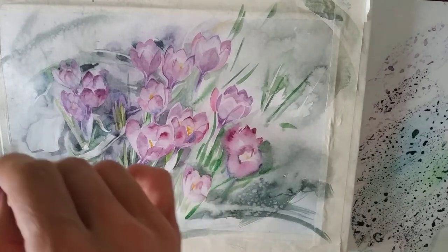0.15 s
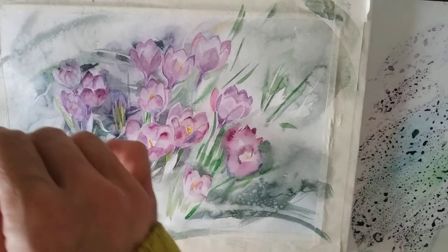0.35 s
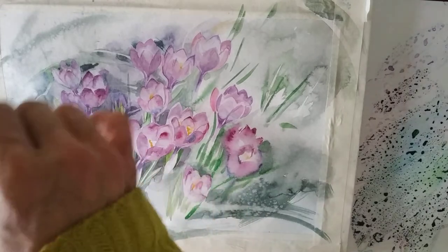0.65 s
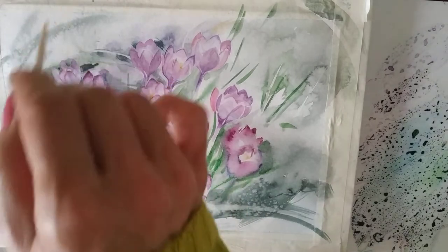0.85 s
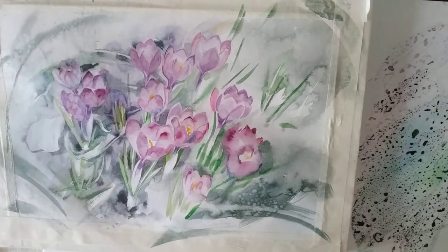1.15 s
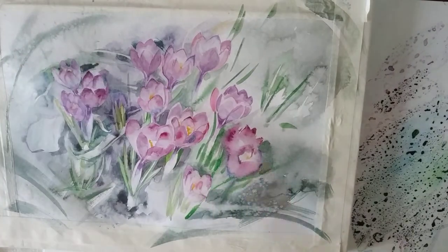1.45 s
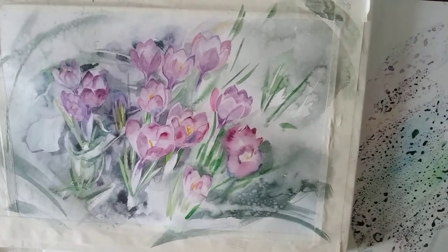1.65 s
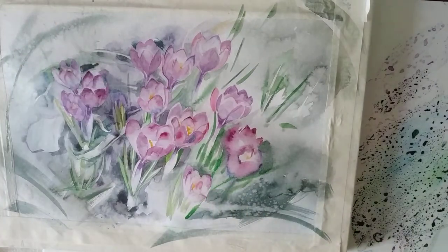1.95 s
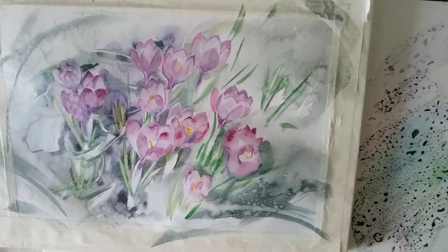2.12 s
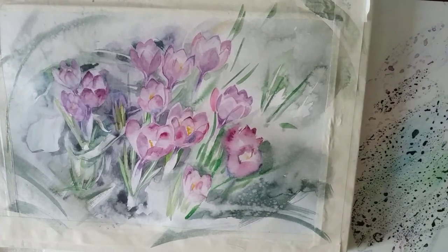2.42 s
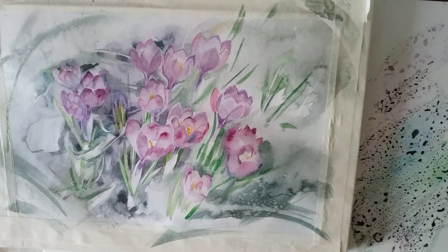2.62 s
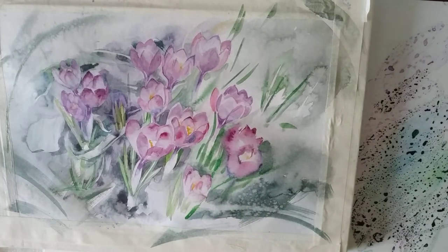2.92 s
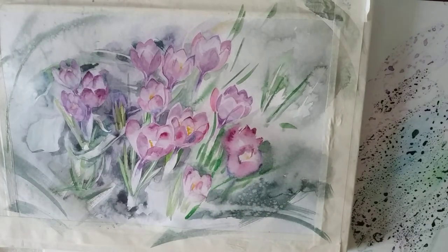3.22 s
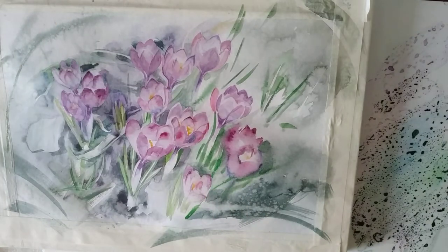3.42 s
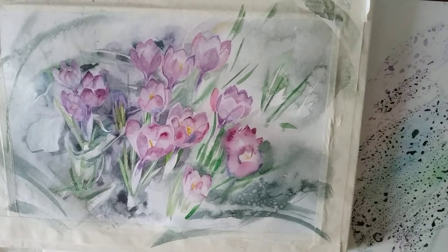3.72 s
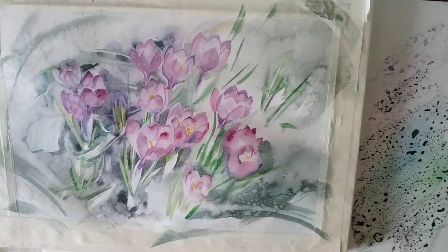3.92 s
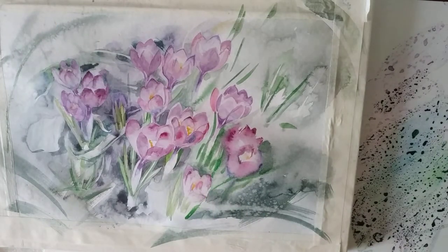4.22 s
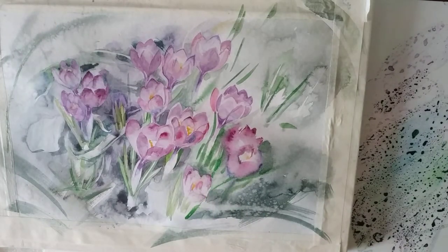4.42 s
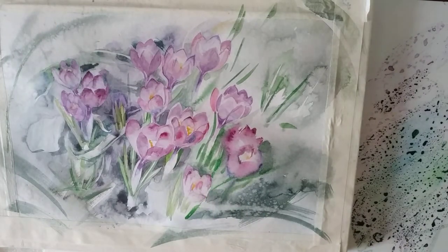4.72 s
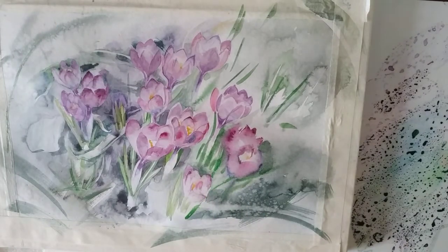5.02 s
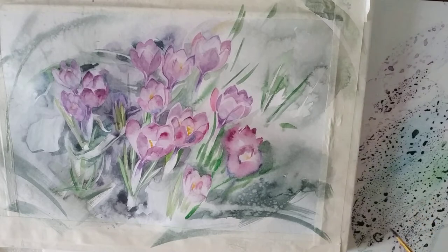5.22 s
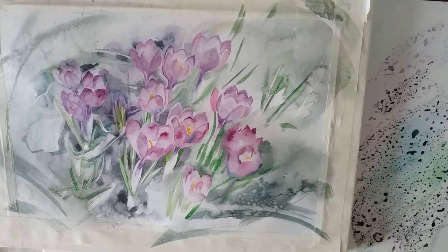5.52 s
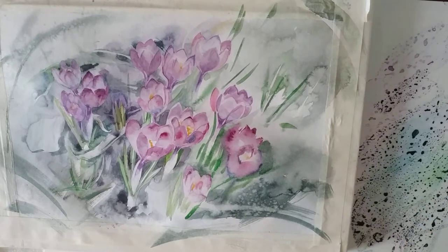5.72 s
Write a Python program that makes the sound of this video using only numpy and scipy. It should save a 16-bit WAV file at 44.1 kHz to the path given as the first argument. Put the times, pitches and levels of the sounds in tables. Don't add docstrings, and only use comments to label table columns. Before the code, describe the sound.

Wool sleeve rustles over a quiet room; a jar thuds down, a brush taps glass sharply, water blips, then two dry rim knocks.

```python
import sys
import numpy as np
from scipy import signal
from scipy.fft import rfft, irfft, next_fast_len
from scipy.io import wavfile
from scipy.ndimage import uniform_filter1d, map_coordinates

SR = 44100
rng = np.random.default_rng(int(sys.argv[2]) if len(sys.argv) > 2 else 0)


def makeup_ratio(level_db):
    decades = np.asarray(level_db, float) / 20
    return 10 ** decades


def transcribe(signal):
    frames = np.atleast_2d(signal).T
    limited = np.clip(frames, -1, 1)
    pcm = np.round(limited * 32767).astype(np.int16)
    wavfile.write(sys.argv[1], SR, pcm)


N = 258639
JAR_LAG = 18
TOP_HZ = 15800


def unit(x):
    return x / np.sqrt(np.mean(x ** 2) + 1e-20)


def along(points, hz):
    f, v = np.transpose(points)
    return np.interp(np.log(hz + 1), np.log(f + 1), v)


def wobble(rate, size=N):
    knots = rng.standard_normal(int(size * rate / SR) + 4)
    return map_coordinates(knots, [np.arange(size) * rate / SR])


def swell(s, rise, fall):
    t = np.arange(N) / SR - s
    return np.exp(-(t / np.where(t < 0, rise, fall)) ** 2)


def arch(u, peak):
    u, peak = np.clip(u, 0, 1), np.clip(peak, .05, .95)
    return np.sin(np.pi / 2 * np.minimum(u / peak, (1 - u) / (1 - peak)))


def filtered(x, response):
    m = next_fast_len(x.shape[-1] + 8192)
    spectrum = rfft(x, m) * response(np.fft.rfftfreq(m, 1 / SR))
    return irfft(spectrum, m)[..., :x.shape[-1]]


def causal(gain_db):
    cepstrum = irfft(np.log(np.maximum(makeup_ratio(gain_db), 1e-4)))
    cepstrum[1:2048] *= 2
    cepstrum[2049:] = 0
    pulse = irfft(np.exp(rfft(cepstrum)))[:1024]
    return pulse / np.abs(pulse).max()


def patchy(patchy_db):
    z = signal.stft(rng.standard_normal((2, N + 512)), nperseg=512)[2]
    field = uniform_filter1d(rng.standard_normal(z.shape[1:]), size=8, axis=0)
    field = uniform_filter1d(field, size=10, axis=1)
    return signal.istft(z * makeup_ratio(patchy_db * unit(field)), nperseg=512)[1][:, :N]


def swish(noise, s, centre_hz, octaves):
    hz, t, z = signal.stft(noise, SR, nperseg=512)
    centre = np.interp(t, s, centre_hz)
    distance = np.log2((hz[:, None] + 1) / centre) / octaves
    hump = np.exp(-.5 * distance ** 2) / np.sqrt(centre) * (hz[:, None] < TOP_HZ)
    return unit(signal.istft(z * hump, SR, nperseg=512)[1][:, :N])


def ring(modes, scatter_db, beat_db=2.0):
    t = np.arange(SR // 3) / SR
    out = np.zeros(len(t))
    for hz, db, t60, rise in modes:
        level_db = db + scatter_db * rng.standard_normal() - 60 * t / t60
        level_db = level_db + beat_db * wobble(12 / t60, size=len(t))
        out += makeup_ratio(level_db) * (1 - np.exp(-t / rise)) * np.sin(2 * np.pi * hz * t)
    return out


# (f/Hz, t60/s)
ROOM_DECAY = [(200, 0.468), (1000, 0.25), (4000, 0.223), (10000, 0.1045), (16000, 0.128)]


def add(out, s, x, pan_db, wet_db, lag=JAR_LAG):
    hz, t, z = signal.stft(rng.standard_normal((2, SR // 3)), SR, nperseg=128)
    decay = makeup_ratio(-60 * t / along(ROOM_DECAY, hz)[:, None]) * (hz[:, None] < TOP_HZ)
    tail = signal.istft(z * decay, SR, nperseg=128)[1]
    tail = np.pad(tail / np.linalg.norm(tail[0]), ((0, 0), (200, 0)))
    x = np.atleast_2d(x) * makeup_ratio([[pan_db / 2], [-pan_db / 2]])
    heard = makeup_ratio(wet_db) * signal.fftconvolve(x.mean(axis=0, keepdims=True), tail, axes=1)
    heard[0, lag:lag + x.shape[1]] += x[0]
    heard[1, :x.shape[1]] += x[1]
    start = round(s * SR)
    out[:, start:start + heard.shape[1]] += heard[:, :N - start]


# (f/Hz, level/dB per Hz)
ROOM_TONE = [(40, -48.5), (70, -31), (100, -15.5), (200, -4.5), (300, -5.5), (600, -10), (1200, -13.5),
             (2500, -16), (5000, -17), (8000, -17), (10800, -13), (12500, -13), (15500, -19)]
# (f/Hz, correlation)
ROOM_ALIKE = [(60, 1), (180, 0.25), (550, 0.073), (1650, -0.042), (4970, -0.029), (15000, 0.027)]


def air():
    def mid_and_side(hz):
        turn = np.arccos(np.clip(along(ROOM_ALIKE, hz), -1, 1)) / 2
        return makeup_ratio(along(ROOM_TONE, hz)) * (hz < TOP_HZ) * [np.cos(turn), np.sin(turn)]

    mid, side = filtered(patchy(patchy_db=-2.0), mid_and_side)
    return makeup_ratio(-59.28) * unit(np.array([mid + side, mid - side]))


# (f/Hz, width/Hz, level/dB)
HUM = [(428.93, 24.3, -74.5), (216, 102.6, -71.5)]


def drone():
    out = np.zeros(N)
    for hz, width, db in HUM:
        drift = makeup_ratio(db + 1.54 * wobble(rate=2.956))
        band = filtered(rng.standard_normal(N), lambda f: 1 / (1 + (2 * (f - hz) / width) ** 2))
        out += drift * unit(band)
    return out


# (t/s, level/dB)
THUDS = [(1.987, -57), (2.62, -65.5), (3.0535, -53), (3.084, -52), (0.72, -66), (4.1, -70.5),
         (4.115, -52.5)]
# (f/Hz, level/dB, t60/s, rise/s)
BOARD_MODES = [(205, -5.5, 0.076, 0.0087), (255.3, 0.5, 0.161, 0.0029), (322.2, 0, 0.051, 0.00066),
               (430, 1, 0.039, 0.0016), (720, -23, 0.05, 0.0054)]


def thuds():
    out = np.zeros((2, N))
    for s, db in THUDS:
        add(out, s, makeup_ratio(db) * ring(BOARD_MODES, scatter_db=-0.5), pan_db=-4.14, wet_db=-12.5, lag=1)
    return out


# (t/s, [(f/Hz, level/dB, t60/s, rise/s)])
SET_DOWN = [
    (1.9198, [(400.7, -36, 0.0436, 0.0026), (720, -45.5, 0.0365, 0.0017)]),
    (1.9237, [(284.6, -24.5, 0.0242, 0.0027), (1150, -60, .02, 0.00195)]),
    (1.9368, [(205, -30, 0.082, 0.0063), (430, -43, 0.053, 0.00184)]),
    (1.9546, [(249.5, -27.5, 0.0608, 0.0094), (417, -44, 0.064, 0.0022)]),
]


def set_down():
    out = np.zeros((2, N))
    for s, modes in SET_DOWN:
        add(out, s, ring(modes, scatter_db=0.83, beat_db=-1.67), pan_db=1.72, wet_db=-17.5, lag=1)
    return out


# (f/Hz, level/dB per Hz)
WOOL_BRIGHT = [(2350, -43.5), (4000, -21.5), (4860, -8.5), (5170, -9), (6430, 0), (8370, -1.5), (10900, 2),
               (15700, -2)]
# (f/Hz, level/dB per Hz)
WOOL_DULL = [(150, -42.5), (300, 6.5), (600, -0.5), (1200, -3.5), (2000, -26)]
# (peak t/s, rise/s, fall/s, rustle level/dB, swish over the rustle/dB)
STROKES = [(.2, 0.049, 0.071, -77.5, 8.5), (.45, 0.137, 0.094, -72, 6), (.69, 0.036, 0.0662, -54.5, -5),
           (1.03, 0.087, 0.086, -74, 6.5), (1.39, 0.093, 0.0416, -59, -3.5),
           (1.51, 0.0648, 0.158, -50.5, -10), (1.75, 0.157, 0.173, -65.5, 1.5),
           (2.0, 0.166, 0.5, -56.5, -5.5), (2.414, 0.016, 0.0241, -63, 5), (2.56, 0.038, 0.0685, -62, -3),
           (2.95, 0.382, 0.22, -65, -2), (3.5, 0.0678, 0.43, -73.5, -10.5),
           (4.478, 0.0327, 0.0306, -66, -2.5), (4.68, 0.1195, 0.129, -57.5, -8.5),
           (4.84, 0.063, 0.232, -58, -7), (5.34, 0.1354, 0.086, -56, -16), (5.86, 0.184, .1, -63, -14.5)]
STROKE_SIDES = [-4, -0.5, 5, -2, -1.5, 2.5, -1.5, -1.5, 1, -2, -1.5, -1.5, -1.5, -1.18, -0.7, 3, 1.5]
# (t/s, level/dB)
CUFF = [(.485, -75), (.634, -70), (.746, -62.5), (1.5, -66.5), (2.679, -60), (2.99, -58.5), (3.06, -59.5),
        (3.456, -63.5), (4.478, -70)]


def sleeve():
    rest_db, rest_hz, octaves_per_db = -77.5, 2454, 0.0047
    shapes = np.array([makeup_ratio(db) * swell(s, rise, fall) for s, rise, fall, db, _ in STROKES])
    sides = makeup_ratio(np.outer([.5, -.5], STROKE_SIDES))
    rustle = makeup_ratio(rest_db) + sides @ shapes
    duller = makeup_ratio(rest_db) + (sides * makeup_ratio(np.transpose(STROKES)[-1])) @ shapes
    rustle_db = 20 * np.log10(rustle.mean(axis=0))
    centre_hz = rest_hz * 2 ** (octaves_per_db * (rustle_db - rest_db))

    grains = makeup_ratio(1.05 * wobble(rate=460) + 0.56 * wobble(rate=69))
    bright = filtered(grains * patchy(patchy_db=3.0), lambda hz: makeup_ratio(along(WOOL_BRIGHT, hz)) * (hz < TOP_HZ))
    dull = swish(grains * patchy(patchy_db=2.5), np.arange(N) / SR, centre_hz, octaves=1.152)
    drag = unit(filtered(patchy(patchy_db=2.5), lambda hz: makeup_ratio(along(WOOL_DULL, hz))))

    bumps = sum(makeup_ratio(db) * swell(s, rise=0.0169, fall=0.018) for s, db in CUFF)
    pull = makeup_ratio(-11 + 3.5 * wobble(rate=14)) * duller.mean(axis=0) + bumps
    out = makeup_ratio(2.5) * rustle * unit(bright) + makeup_ratio(1.18) * duller * dull
    return out + makeup_ratio(-3.0) * pull * (drag + 0.429 * drag[::-1])


# (start t/s, length/s, first f/Hz, last f/Hz, level/dB)
WIPES = [(0.137, 0.092, 1700, 1700, -69), (0.325, 0.059, 1900, 1800, -66), (.415, 0.055, 2000, 1700, -64),
         (.468, 0.0375, 1350, 1255, -62), (0.651, 0.044, 5070, 4160, -52.5),
         (0.692, 0.0226, 5500, 5020, -52), (0.707, 0.0396, 2310, 2150, -59.5),
         (0.748, 0.032, 1800, 1300, -70)]


def wipes():
    start, length, first_hz, last_hz, _ = np.transpose(WIPES)
    s = np.ravel([start, start + length], "F")
    hz = np.ravel([first_hz, last_hz], "F")
    t = np.arange(N) / SR
    pressure = sum(makeup_ratio(db) * arch((t - at) / span, peak=0.516) for at, span, _, _, db in WIPES)
    grains = makeup_ratio(2.8 * wobble(rate=600))
    return pressure * makeup_ratio([[4.5], [1.5]]) * swish(grains * patchy(patchy_db=4.0), np.sort(s), hz, octaves=0.228)


# (t/s, f/Hz, level/dB)
SNAGS = [(.628, 7500, -38.5), (0.627, 4700, -49), (0.675, 4930, -38), (.677, 8700, -35.5),
         (.701, 8650, -33), (1.205, 6000, -48), (2.281, 8000, -28), (2.286, 8300, -41.5),
         (4.316, 5140, -43), (4.477, 2470, -51), (5.03, 6000, -55)]


def snags():
    out = np.zeros((2, N))
    for s, hz, db in SNAGS:
        add(out, s, ring([(hz, db, 14 / hz, .0002)], scatter_db=0), pan_db=1.5, wet_db=-3, lag=0)
    return out


# (start t/s, length/s, first f/Hz, last f/Hz, level/dB)
BUBBLES = [(2.176, 0.0636, 934, 910.9, -40.5), (2.211, 0.0224, 1091, 2130, -40.5),
           (2.235, 0.0145, 1495, 2330, -46), (2.27, 0.0193, 2790, 2970, -49),
           (2.325, 0.0264, 1204, 1998, -36.5), (2.345, 0.02, 1698, 1350, -55),
           (2.393, 0.051, 2730, 2800, -60.5), (2.529, .055, 2850, 3408, -50.5),
           (4.088, 0.063, 274.7, 239, -58.5), (4.126, 0.087, 225.9, 241, -56),
           (4.205, 0.109, 229.4, 175, -56)]
BUBBLE_SIDES = [2.5, 2.5, -4.5, 0, -5.5, -2, -6.5, -7.5, 4.5, 3, 1]


def bubbles():
    out = np.zeros((2, N))
    for (s, length, first_hz, last_hz, db), pan_db in zip(BUBBLES, BUBBLE_SIDES):
        u = np.arange(round(length * SR)) / (length * SR)
        hz = first_hz * (last_hz / first_hz) ** (u ** 1.11)
        hz = hz * (1 + 0.0295 * wobble(rate=206.3, size=len(u)))
        phase = 2 * np.pi * np.cumsum(hz) / SR
        flutter_db = 1.6 * wobble(rate=150, size=len(u))
        tone = makeup_ratio(db + flutter_db) * arch(u, peak=0.212) * np.sin(phase)
        add(out, s, tone, pan_db, wet_db=-16.5)
    return out


# (t/s, f/Hz, level/dB, left-right level/dB)
DRIPS = [(2.9851, 1657, -34.5, -5.5), (2.9930, 1792, -33.5, -2.5), (3.0117, 1890, -41, -0.5)]


def drips():
    out = np.zeros((2, N))
    t60, rise = 0.0103, 0.000256
    for s, hz, db, pan_db in DRIPS:
        modes = [(hz, db, t60, rise), (1.33 * hz, db - 11.5, t60, rise)]
        add(out, s, ring(modes, scatter_db=-0.5), pan_db, wet_db=-19)
    return out


# (t/s, left-right level/dB, [(f/Hz, level/dB, t60/s, rise/s)])
GLASS_RINGS = [(2.162, -10.5, [(3006, -21, 0.019, 0.0023), (6200, -36.5, 0.0023, 0.000097)]),
               (2.164, 6, [(2925, -25.5, 0.0182, 0.0016)]), (2.167, -5, [(7864, -23, 0.00975, 0.00048),
               (6860, -38, 0.0094, .001), (2872, -31.5, 0.018, 0.00055)]),
               (2.292, -4, [(1344, -26.5, 0.054, 0.00107), (1213, -42.5, 0.267, 0.0025),
               (1840, -54.5, 0.052, 0.0031), (4550, -29, 0.056, 0.0042), (4367, -37, 0.052, 0.0031),
               (6250, -22, 0.0375, 0.00054), (7860, -22, 0.0267, 0.00084), (4070, -39.5, 0.091, 0.00104),
               (2580, -49.5, 0.086, 0.00205), (269.7, -51, 0.525, 0.0042)]),
               (2.4692, 1, [(2977, -15.5, 0.0158, 0.0025), (5683, -32.5, 0.03, 0.00102),
               (511.8, -39, 0.101, 0.00216), (430, -50.5, 0.105, 0.0026), (1345, -39, 0.079, 0.0025)]),
               (2.496, -2.5, [(2355, -37.5, 0.0178, 0.00095), (4630, -45.5, 0.0195, .001)])]
# (t/s, left-right level/dB, [(f/Hz, level/dB, t60/s, rise/s)])
RIM_RINGS = [
    (3.84, 3.2, [(537.6, -39.5, 0.0766, 0.00287), (286.6, -49, 0.116, 0.0057), (1187, -48, 0.106, 0.0024), (5180, -38.5, 0.027, .002), (2933, -45, 0.047, 0.0045), (2484, -45.5, 0.046, 0.0023), (424.6, -56, 0.273, 0.029)]),
    (4.0643, 0.54, [(545, -38.5, 0.0643, 0.0035), (663, -51.5, 0.056, 0.0031), (305.3, -47.5, 0.057, 0.0026), (1187, -46, 0.12, 0.00193), (5070, -43.5, 0.032, 0.0022), (2236, -55.5, 0.02, 0.0024), (2848, -42, 0.054, 0.0134)]),
]


def glass_rings():
    out = np.zeros((2, N))
    for s, pan_db, modes in GLASS_RINGS + RIM_RINGS:
        add(out, s, ring(modes, scatter_db=-0.21, beat_db=0.77), pan_db, wet_db=-14)
    return out


# (t/s, peak level/dB, left-right level/dB)
TAPS = [
    [(2.2917, -9, -0.5), (2.2992, -21.5, 2)],
    [(2.4691, -22, -4), (2.4825, -28, -5), (2.4965, -30.5, -8)],
    [(3.8401, -12.5, -4.5)],
    [(4.0641, -10, -3.5)],
]
# (f/Hz, level/dB per Hz)
TAP_COLOURS = [
    [(290, -54.5), (500, -11), (1320, -16), (2700, -10.5), (3320, -13.5), (4590, -2.5), (5090, -22.5),
     (6340, -1), (12500, 1.5), (15700, 3.5), (16700, -25)],
    [(240, -28), (400, -13.5), (530, -13), (1740, -17.5), (2950, -8), (8270, -7), (9820, -7.5),
     (11000, -6.5), (15700, -17.5), (16700, -32.5)],
    [(410, -59), (700, -17), (1190, -27), (1890, -32), (3050, -16.5), (3830, -30.5), (5060, -6),
     (6170, -16.5), (7630, -5), (12500, -1.5), (15800, -7), (16700, -30)],
    [(410, -37), (700, -17.5), (1500, -40), (2500, -21), (3600, -35), (4500, -11.5), (5200, -5),
     (6170, -12.5), (7500, -4), (12800, 0), (15400, -1), (16700, -27.5)],
]
# (table echo level/dB, scatter level/dB, room level/dB)
TAP_PATHS = [(6.5, -7.5, -6), (-13, -2.5, -2), (-0.5, -6, -7), (-7.5, -8, -7.5)]


def taps():
    out = np.zeros((2, N))
    t, hz = np.arange(2000) / SR, np.fft.rfftfreq(4096, 1 / SR)
    for contacts, colour, (echo_db, scatter_db, room_db) in zip(TAPS, TAP_COLOURS, TAP_PATHS):
        for s, db, pan_db in contacts:
            paths = makeup_ratio(scatter_db - 2.5 - 60 * t / 0.0181) * rng.standard_normal((2, len(t)))
            paths[:, 0] = [makeup_ratio(-3), 1]
            paths[:, 46] = [makeup_ratio(echo_db - 9), makeup_ratio(echo_db)]
            click = causal(along(colour, hz))[None]
            add(out, s, makeup_ratio(db) * signal.fftconvolve(paths, click, axes=1), pan_db, room_db)
    return out


def scene():
    jar = taps() + glass_rings()
    board = thuds() + set_down()
    water = bubbles() + drips()
    room = air() + drone()
    arm = sleeve() + wipes() + snags()
    return jar + board + water + room + arm


def low_pass(x):
    return signal.sosfilt(signal.butter(12, 16960, fs=SR, output="sos"), x)


def record(dry):
    def microphone(hz):
        bass_cut = 1 / (1 + (90 / (hz + 1)) ** 6) ** .5
        return (makeup_ratio(-26.5) + bass_cut) * (hz < 16800)

    return low_pass(filtered(dry, microphone))


dry = scene()
out = record(dry)
transcribe(out)
```